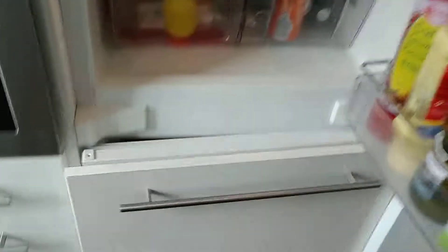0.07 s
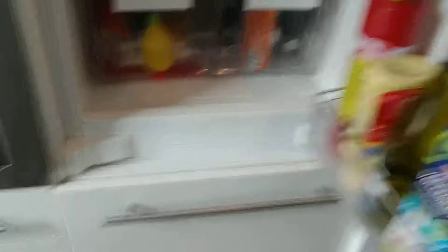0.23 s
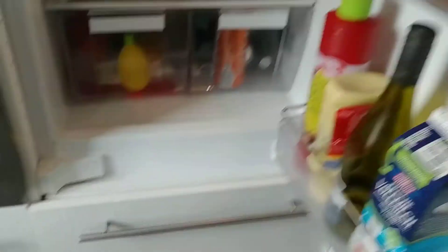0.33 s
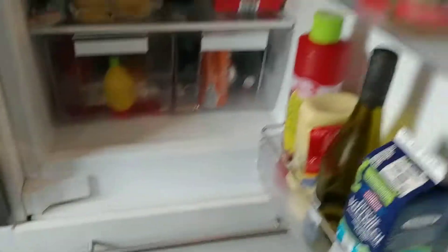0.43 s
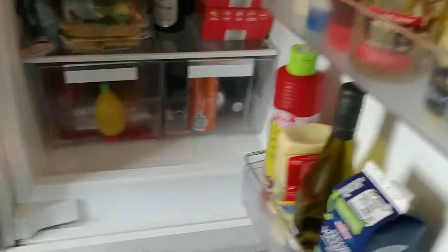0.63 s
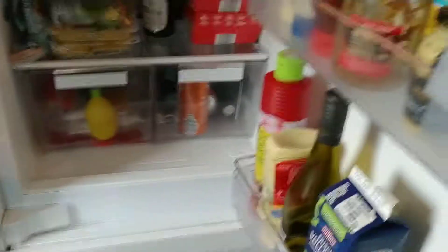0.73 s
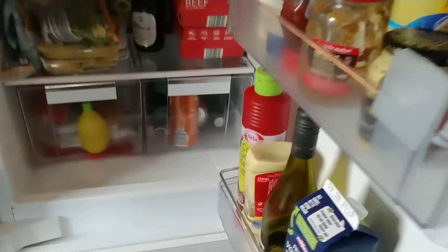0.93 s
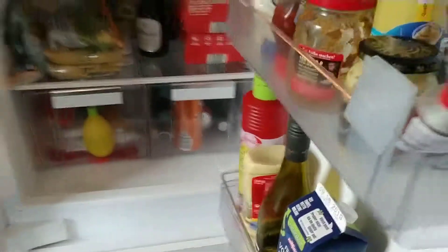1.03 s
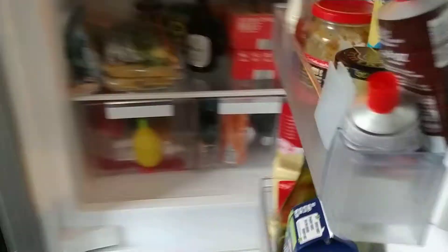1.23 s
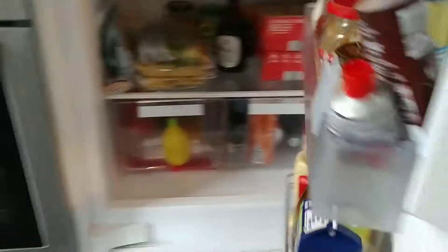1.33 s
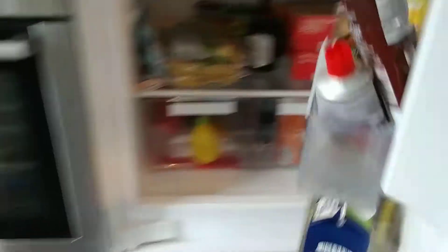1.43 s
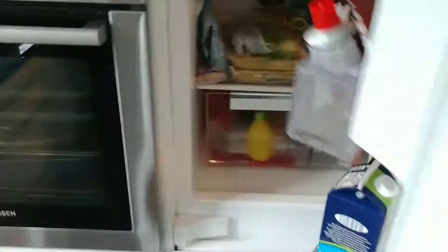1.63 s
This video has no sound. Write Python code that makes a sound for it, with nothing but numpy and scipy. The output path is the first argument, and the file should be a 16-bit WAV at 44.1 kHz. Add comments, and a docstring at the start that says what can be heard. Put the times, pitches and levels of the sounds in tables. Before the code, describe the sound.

A freezer drawer rolls in and slams shut close by, with a short ring in a quiet kitchen. A plastic catch snaps, the seal hisses faintly, and bottles knock softly as the fridge door swings, over a low hum.

```python
"""A freezer drawer rolls in and slams shut in a quiet kitchen, making the cabinet ring.
Frozen packs bump inside it, a plastic catch snaps in, and air hisses through the seal.
A hand takes the open fridge door above; it swings with a soft rumble as bottles knock and clink.
The knocks echo in the room, a sleeve brushes near the microphone, and the compressor hums throughout."""
import sys
import numpy as np
from scipy import signal
from scipy.fft import rfft, irfft
from scipy.io import wavfile

SR = 44100
rng = np.random.default_rng(int(sys.argv[2]) if len(sys.argv) > 2 else 0)


def transcribe(u):
    """Save the signal u as a 16-bit wav file named by the first command-line argument.

    u: samples, shape (n,) or (channels, n), limited to [-1, 1]; the rate is SR.
    q: integer samples, one column per channel.
    """
    v = np.clip(np.atleast_2d(u).T, -1, 1)
    q = np.round(v * 32767).astype(np.int16)
    wavfile.write(sys.argv[1], SR, q)


N = 74970
T, HZ = np.arange(N) / SR, np.fft.rfftfreq(N, 1 / SR)
SIDES = np.array([[1], [-1]])  # left counts as plus, right as minus
RIGHT_LEAD_S = 6 / SR  # clicks and the cabinet's ring reach the right microphone first

# Levels in the tables are relative. A "colour" says how strong the low and high pitches are.
# the drawer hitting the seal and frame, then bouncing (time [s], level [dB])
SLAM_HITS = [(.2335, -13), (.2349, -0.5), (.2392, -15), (.2525, -12)]
# which side the slam is louder on (frequency [Hz], left minus right [dB])
SLAM_BALANCE = [(600, 0.5), (1000, -3.5), (2800, -4), (6000, 0.5)]
# rumble of the swinging fridge door (time [s], level [dB])
SWING_LEVELS = [(.92, -110), (1.012, -75), (1.03, -56), (1.13, -54), (1.38, -51), (1.54, -58), (1.7, -56)]
# colour of that door's rumble and thuds (frequency [Hz], level [dB])
DOOR_COLOUR = [(30, -31), (130, -4.5), (250, -1), (400, -1.5), (540, 2.5), (640, -11.5), (880, -9.5),
               (1170, -1), (1350, -11.5), (2100, -9), (2700, -19.5), (3600, -12), (5800, -17), (7000, -28),
               (8700, -12.5), (10500, -36), (16000, -54)]


def drawer_slam(split_hz=3340):
    """The drawer hits the cabinet: a hard crack, then a burst from the shaking panels."""
    # colour of the slam (frequency [Hz], level [dB])
    colour = [(30, -44.5), (60, -31.5), (95, -6.5), (230, -12), (340, -15), (470, -7.5), (720, -10.5),
              (1000, -1.5), (1300, -6.5), (1580, -7.5), (1750, -9), (2620, -16), (3400, -12), (5500, -12.5),
              (8000, -9), (11700, -11), (16000, -22.5)]
    low_share = 1 / (1 + (HZ / split_hz) ** 4)
    lows = rfft(clatter(SLAM_HITS, colour, t60=0.097)) * np.sqrt(low_share)
    highs = rfft(clatter(SLAM_HITS, colour, t60=0.081)) * np.sqrt(1 - low_share)
    bang = amp(-18.5) * (lows + highs) + amp(-2) * rfft(click(SLAM_HITS, colour))
    return irfft(bang * amp(read(SLAM_BALANCE) / 2 * SIDES), N)


def cabinet_ring(swell_cycles=1.54):
    """After the hardest hit, the cabinet's own notes build up quickly and die away."""
    # notes of the cabinet and drawer front (frequency [Hz], level [dB], time to fade by 60 dB [s])
    modes = [(79.4, 6, 0.18), (131, -10, 0.39), (194, -9, .3), (208, -4, 0.5), (412.4, -5.5, 0.33),
             (493.6, -10, 0.45), (665.4, -5, 0.27), (770, -4, 0.26), (960, 1, 0.12), (1117, 2.5, 0.11),
             (1183, -1, 0.1), (1440, 2.5, 0.091), (1582, 3.5, 0.09), (1640, -4.5, 0.23)]
    hit_s = max(SLAM_HITS, key=lambda row: row[1])[0]
    age = np.maximum(T - hit_s - np.array([[RIGHT_LEAD_S], [0]]), 0)
    ring = np.zeros((2, N))
    for hz, db, t60 in modes:
        lean_db = read(SLAM_BALANCE, hz) / 2 * SIDES
        swell = 1 - np.exp(-age * hz / swell_cycles)
        ring += amp(db + lean_db - 60 * age / t60) * swell * np.sin(2 * np.pi * hz * age)
    return amp(-34) * ring


def drawer_catch():
    """The plastic catch snaps in just after the slam."""
    # colour of the snap (frequency [Hz], level [dB])
    colour = [(100, -54), (1000, -11), (2500, -2), (5000, -12), (7000, -4.5), (9000, 4), (11500, -1.5),
              (14000, -0.5), (16000, 1)]
    return snap([(0.3563, -25.5)], colour, t60=0.028)


def drawer_runners():
    """The moving drawer rumbles on its runners while its slides scrape thinly."""
    # loudness of the rumble and the scrape (time [s], level [dB])
    roll_levels, scrape_levels = [(0, -77.5), (.11, -62), (.16, -48.5), (.22, -50.5), (.26, -42.5),
                                  (.39, -49.5), (.49, -59.5), (.59, -100)], [(0, -58), (.022, -56), (.032, -52.5), (.11, -57),
                                                (.17, -66), (.24, -49.5), (.3, -110)]
    # their colours (frequency [Hz], level [dB])
    roll_colour, scrape_colour = [(25, -34), (70, -17.5), (120, -1.5), (165, -7), (220, -3), (320, -12.5),
                                  (700, -10.5), (1500, -17.5), (4000, -31), (16000, -71)], [(100, -28.5), (600, -12.5), (1150, 1), (2000, -3.5),
                                                       (2800, -10), (4000, -10.5), (7000, -10.5),
                                                       (16000, -24.5)]
    roll = rub(roll_levels, roll_colour, rough_db=1.5, rate_hz=81)
    return roll + rub(scrape_levels, scrape_colour, rough_db=1.5, rate_hz=110)


def frozen_packs():
    """Packs bump in the drawer, each with a click, a short clatter and a note."""
    # bumps (time [s], clatter level [dB], note [Hz], note level [dB])
    bumps = [(.126, -47, 1590, -45.5), (.1295, -50.5, 1210, -43), (.1455, -39, 2270, -46),
             (.1562, -47.5, 1410, -48), (.1885, -48.5, 847, -41.5), (.283, -36.5, 1140, -51),
             (.305, -45.5, 1098, -44), (.315, -52, 915, -38)]
    # colour of the clatter (frequency [Hz], level [dB])
    colour = [(60, -29), (200, 3), (400, -12), (800, -6), (1250, 1.5), (2300, -3), (5000, -13),
              (16000, -42.5)]
    return snap([row[:2] for row in bumps], colour, t60=0.046) + notes(bumps, t60=0.041)


def seal_hiss():
    """Air whistles through the seal as the cold compartment sucks it shut."""
    # loudness of the hiss (time [s], level [dB])
    levels = [(.38, -77), (.45, -51.5), (.56, -61), (.68, -56.5), (.84, -59), (.91, -72.5), (1.0, -100)]
    # its colour (frequency [Hz], level [dB])
    colour = [(1300, -37.5), (2000, -6.5), (2450, -23.5), (3150, -2), (3800, 1.5), (4400, -16),
              (5800, -17.5), (7700, -8.5), (9000, 7), (9800, -5), (13700, 0), (16000, -9.5)]
    return rub(levels, colour, rough_db=2.6, rate_hz=16.5)


def plastic_ticks():
    """Plastic parts give small, bright ticks."""
    # ticks (time [s], level [dB])
    ticks = [(.028, -45.5), (.698, -58), (.921, -52.5), (.929, -47.5), (.9725, -45.5), (1.007, -48),
             (1.047, -46), (1.231, -52.5)]
    # their colour (frequency [Hz], level [dB])
    colour = [(100, -41.5), (1000, -21), (4000, -5), (6500, -11), (9000, 2), (11500, -6), (14000, -26.5),
              (16000, -10)]
    return snap(ticks, colour, t60=0.031)


def fridge_door():
    """Fingers slide onto the door's edge, and it swings with a soft rumble."""
    # loudness of the rubbing fingers (time [s], level [dB])
    grip_levels = [(.86, -86), (.925, -54.5), (.952, -66.5), (.985, -59), (1.015, -49), (1.09, -100)]
    # colour of the rubbing (frequency [Hz], level [dB])
    grip_colour = [(100, -26.5), (700, -13), (1200, -1), (2200, -3), (3000, -6.5), (4000, -5.5),
                   (6000, -36.5), (16000, -10.5)]
    fingers = rub(grip_levels, grip_colour, rough_db=2.0, rate_hz=66)
    return fingers + rub(SWING_LEVELS, DOOR_COLOUR, rough_db=1.57, rate_hz=27)


def door_shelves(taps_per_s=34):
    """Bottles and loose packs make the plastic shelves ring; heavier knocks also thump the door."""
    # bottle knocks (time [s], clatter level [dB], note [Hz], note level [dB], thump level [dB])
    knocks = [(0.9789, -50, 1150, -52, -90), (1.008, -52, 2110, -46.5, -78),
              (1.021, -42.5, 1690, -43.5, -45.5), (1.058, -48, 2210, -57.5, -66),
              (1.192, -60, 1394, -47, -53), (1.291, -58, 1147, -50, -62),
              (1.577, -53.5, 1134, -52.5, -58.5)]
    # colour of the clatter (frequency [Hz], level [dB])
    colour = [(60, -36), (700, -6.5), (1150, -0.5), (1800, -4.5), (2500, -14), (16000, -20)]
    # notes of the shelves and the hollow door (frequency [Hz], level [dB], time to fade by 60 dB [s])
    shelf_modes, door_modes = [(1096, -14.5, 0.14), (1260, -6.5, 0.1), (1500, -0.5, 0.092),
                               (1666, -20, 0.28)], [(309, -15.5, 0.18), (453, -7.5, 0.18), (513, -8, 0.18),
                                              (683, -5.5, 0.106)]
    hits = [row[:2] for row in knocks]
    thumps = [(row[0], row[-1]) for row in knocks]
    taps = rng.uniform(-1, 1, N) * (rng.random(N) < taps_per_s / SR)
    taps *= amp(4.5 + level_curve(SWING_LEVELS))  # loose packs tap harder as the rumble grows
    bottles = clatter(hits, colour, t60=0.051) + notes(knocks, t60=0.032)
    shelves = amp(-10.5) * convolve(strikes(hits) + taps, ringing(shelf_modes))
    door_ring = convolve(strikes(thumps), ringing(door_modes))
    door_thud = amp(-3.5) * clatter(thumps, DOOR_COLOUR, t60=0.1)
    return bottles + shelves + door_ring + door_thud


def glass_clinks():
    """Glass touches glass and rings briefly."""
    # touches (time [s], level [dB])
    touches = [(1.214, -53.5), (1.37, -51), (1.585, -55.5)]
    # colour with one sharp, high peak (frequency [Hz], level [dB])
    colour = [(100, -27), (2900, -25), (3620, 30), (4400, -18), (16000, -20)]
    return clatter(touches, colour, t60=0.09)


def sleeve():
    """Cloth brushes softly near the microphone."""
    # loudness of the brushing (time [s], level [dB])
    levels = [(0, -71), (.034, -58.5), (.13, -62), (.5, -60), (.95, -72.5), (1.07, -58), (1.14, -69.5),
              (1.35, -71), (1.48, -59), (1.6, -50), (1.7, -58)]
    # its colour (frequency [Hz], level [dB])
    colour = [(750, -23.5), (2500, -21.5), (3500, -7.5), (6500, -6), (9000, 2.5), (10200, 0), (13800, -2),
              (16000, -8.5)]
    return rub(levels, colour, rough_db=0.6, rate_hz=150)


def compressor(hum_hz=99.35):
    """The compressor hums at twice the mains frequency, wavering a little."""
    # loudness of the hum at the moving microphone (time [s], level [dB])
    levels = [(0, -53), (.3, -54), (.45, -52.5), (.95, -55.5), (1.07, -53), (1.17, -60), (1.3, -51.5),
              (1.45, -55.5), (1.7, -57)]
    level_db = level_curve(levels) + 0.5 * drift(5.2)
    phase = 2 * np.pi * hum_hz * T + 0.075 * drift(4.6)
    return np.sqrt(2) * np.sin(phase) * amp(level_db)


def wall_echo(x, delay_s=0.0017, gain=0.39):
    """Sound bounces off the near wall, boosting some pitches and weakening others."""
    reflection = gain * np.exp(-2j * np.pi * HZ * delay_s)
    return irfft(rfft(x) * (1 + reflection), N) / np.hypot(1, gain)


def kitchen_echo(x, build_s=0.0054):
    """Many reflections blur into a tail in which each pitch fades at its own speed."""
    # how long the room rings (frequency [Hz], time to fade by 60 dB [s])
    fade_times = [(60, .3), (200, 0.31), (400, 0.55), (1000, 0.55), (4000, 1), (9000, 0.62), (16000, 0.53)]
    # colour of the tail (frequency [Hz], level [dB])
    colour = [(60, -17.5), (300, 13.5), (1000, -3.5), (3000, -5.5), (9000, 2.5), (16000, 0)]
    hz, t, bands = signal.stft(noise(), SR, nperseg=256)
    fade = amp(-60 * t / read(fade_times, hz)[:, None])
    tail = signal.istft(bands * fade, SR, nperseg=256)[1][:, :N]
    tail *= 1 - np.exp(-(T / build_s) ** 2)
    return convolve(x, tint(unit(tail) / np.sqrt(N), colour))


def room_air():
    """The faint, low background noise of a still room."""
    # colour of the background (frequency [Hz], level [dB])
    colour = [(20, -18.5), (50, -11), (85, -1), (140, -3.5), (250, -20.5), (500, -25), (1000, -48),
              (16000, -42.5)]
    return amp(-68) * tint(noise(), colour)


def clatter(hits, colour, t60):
    """Each hit starts a noise burst, like many crowded notes, that fades by 60 dB in t60 seconds."""
    power = sum((T >= s) * amp(db - 60 * np.maximum(T - s, 0) / t60) ** 2 for s, db in hits)
    return tint(noise() * np.sqrt(power), colour)


def click(hits, colour):
    """The bare click of two things meeting, heard first on the right."""
    right = tint(strikes(hits), colour)[0]
    return np.array([np.interp(T - RIGHT_LEAD_S, T, right), right])


def snap(hits, colour, t60):
    """A small contact: a click followed by a short clatter."""
    return clatter(hits, colour, t60) + amp(9) * click(hits, colour)


def rub(levels, colour, rough_db, rate_hz):
    """Uneven rubbing or airflow that follows a loudness curve."""
    rough_noise = noise() * unit(amp(rough_db * drift(rate_hz)))
    return tint(rough_noise, colour) * amp(level_curve(levels))


def notes(rows, t60):
    """Each struck item rings briefly at its own pitch."""
    return sum(convolve(strikes([(s, db)]), ringing([(hz, 0, t60)])) for s, _, hz, db, *_ in rows)


def ringing(modes):
    """An object's own notes (its modes) fading after one tap."""
    return sum(amp(db - 60 * T / t60) * np.sin(2 * np.pi * hz * T) for hz, db, t60 in modes)


def strikes(hits):
    """One single-sample spike for each hit."""
    spikes = np.zeros(N)
    for s, db in hits:
        spikes[round(s * SR)] += amp(db)
    return spikes


def noise():
    """White noise at two microphones, alike in the bass and a little louder on the right."""
    # how alike the two sides are (frequency [Hz], correlation [0 to 1])
    likeness = [(50, 0.76), (130, 1), (300, 0.88), (700, 0.56), (1500, 0), (16000, 0)]
    common, separate = rfft(rng.standard_normal((2, N)))
    same, lean = np.clip(read(likeness), -1, 1), amp(-0.94 / 2)
    right = same * common + np.sqrt(1 - same ** 2) * separate
    return unit(irfft([common * lean, right / lean], N))


def drift(rate_hz):
    """Random wandering, mostly slower than rate_hz."""
    return unit(irfft(rfft(rng.standard_normal(N)) / (1 + (HZ / rate_hz) ** 4), N))


def tint(x, colour):
    """Gives a sound a colour, using a filter that leaves white noise equally strong."""
    log_gain = np.log(unit(amp(read(colour, abs(np.fft.fftfreq(4096, 1 / SR))))))
    response = np.exp(np.conj(signal.hilbert(log_gain)))  # rings after a hit, never before it
    return convolve(x, np.fft.ifft(response).real[:2048])


def convolve(a, b):
    """Starts a scaled copy of b at every sample of a, cut to the scene's length."""
    return signal.fftconvolve(np.atleast_2d(a), np.atleast_2d(b), axes=1)[:, :N]


def level_curve(points):
    """Joins (time, level) points with straight lines."""
    return np.interp(T, *np.transpose(points))


def read(points, hz=HZ):
    """Reads between a table's rows on a log-frequency axis."""
    frequency, value = np.transpose(points)
    return np.interp(np.log(hz + 1), np.log(frequency + 1), value)


def amp(db):
    """Turns decibels into a gain."""
    return 10 ** (np.asarray(db) / 20)


def unit(x):
    """Scales a signal to an average power of 1."""
    return x / np.sqrt(np.mean(x ** 2) + 1e-20)


def scene():
    """The slam and small knocks with their echoes, plus rubbing, hiss and hum."""
    drawer = drawer_slam() + drawer_catch()
    knocks = frozen_packs() + plastic_ticks() + door_shelves() + glass_clinks()
    knocks *= amp(-3 / 2 * SIDES)  # shifted 3 dB toward the right
    direct = drawer + cabinet_ring() + drawer_runners() + fridge_door()
    near_wall = wall_echo(knocks + seal_hiss() + sleeve())
    room = kitchen_echo(amp(-9.5) * drawer + amp(-8) * knocks)
    return direct + near_wall + room + compressor() + room_air()


def record(dry):
    """Cuts away the very highest treble, above 16 kHz."""
    low_pass = signal.firwin(511, 16000, window=("kaiser", 9), fs=SR)
    return signal.oaconvolve(dry, low_pass[None], "same")


dry = scene()
out = record(dry)
transcribe(out)
```